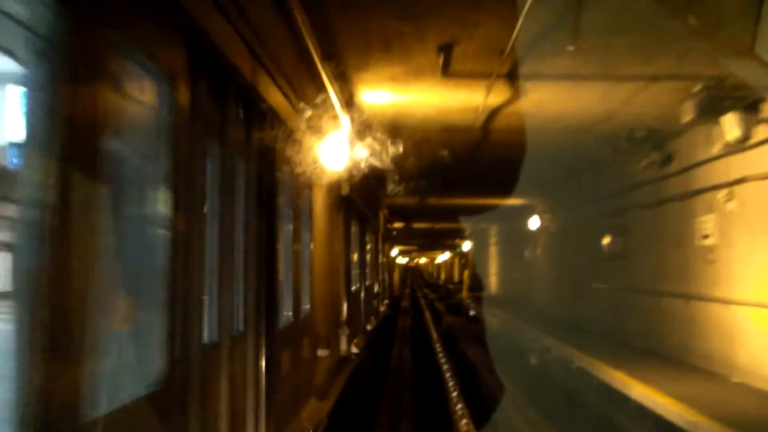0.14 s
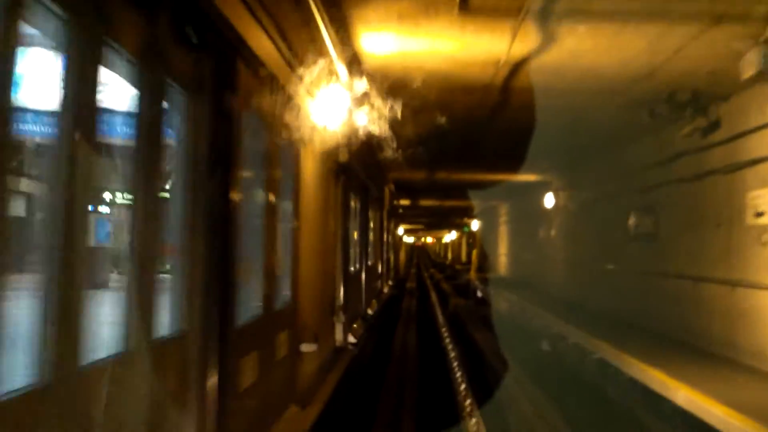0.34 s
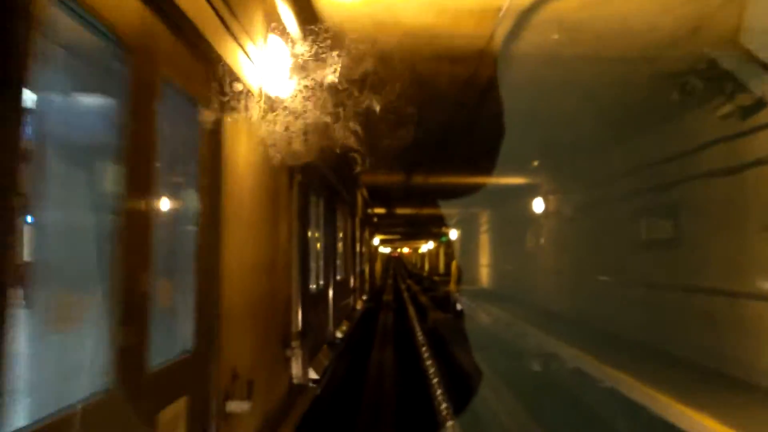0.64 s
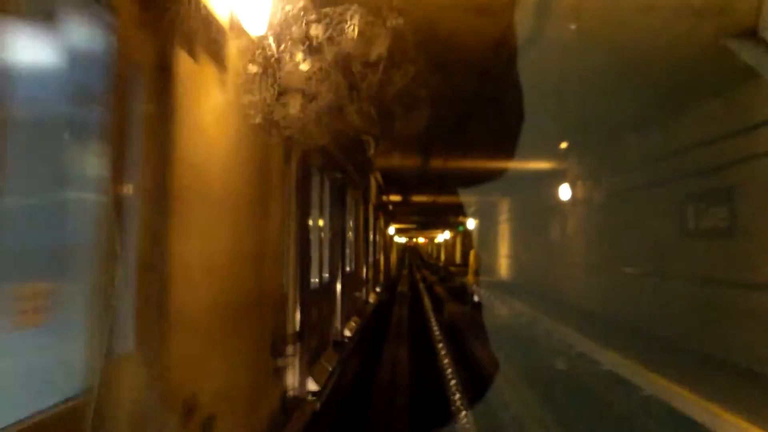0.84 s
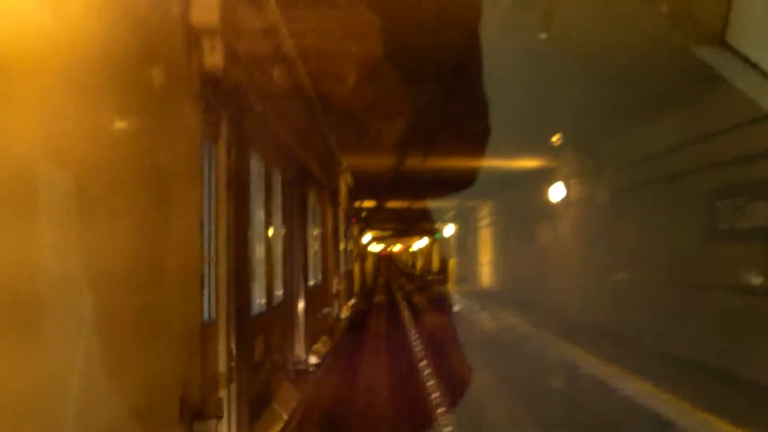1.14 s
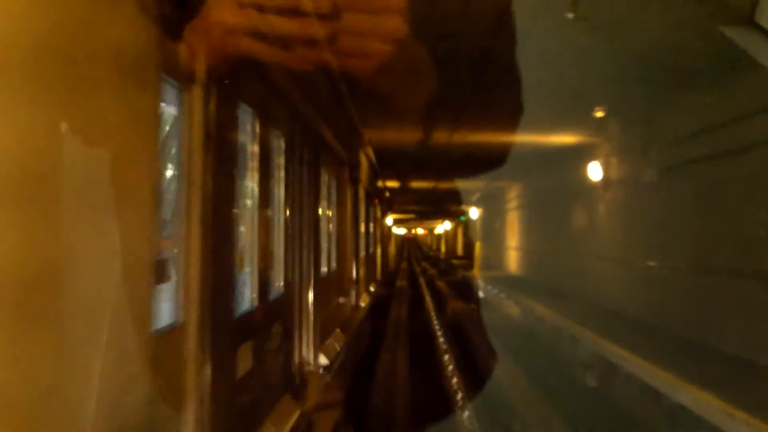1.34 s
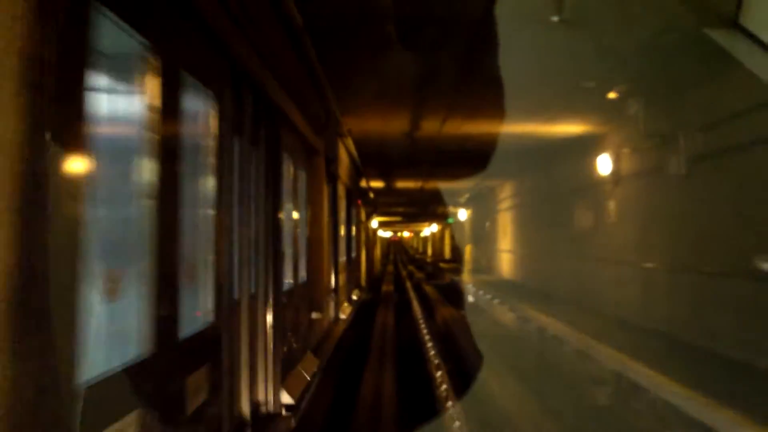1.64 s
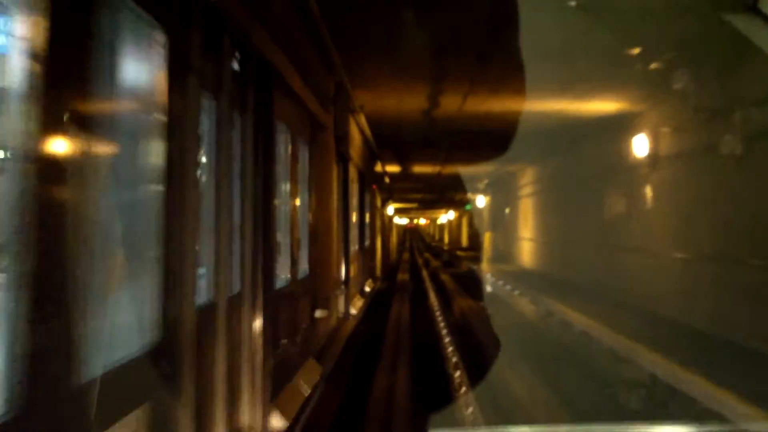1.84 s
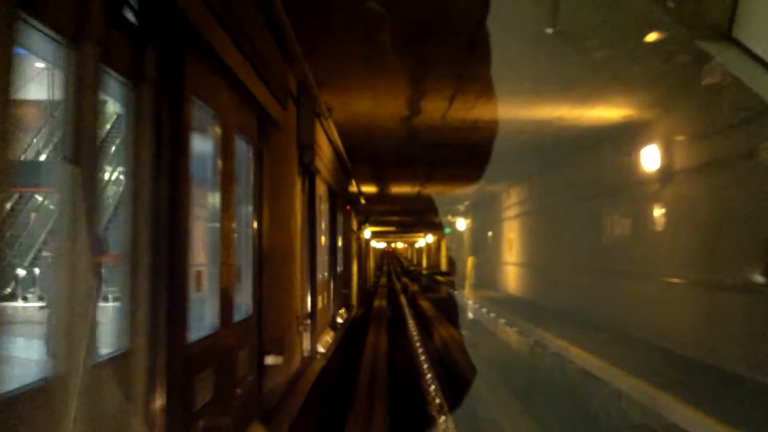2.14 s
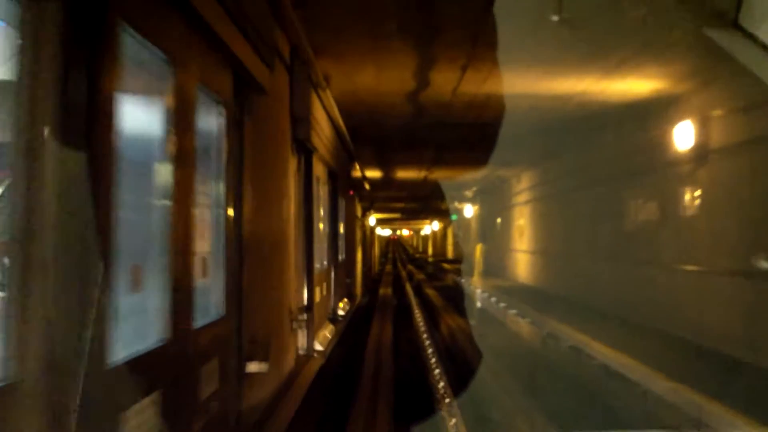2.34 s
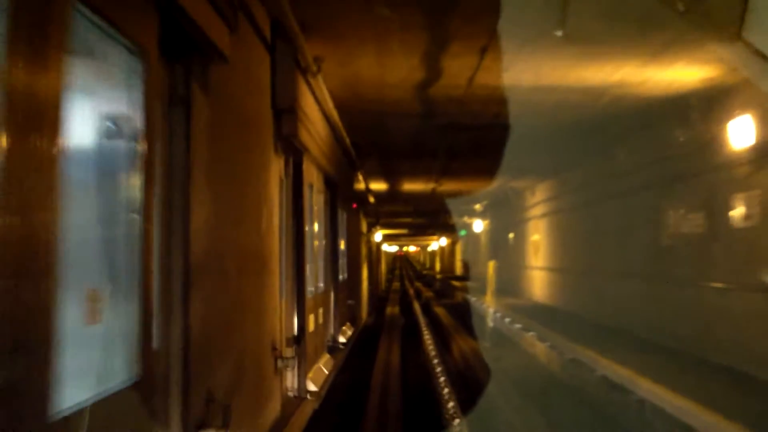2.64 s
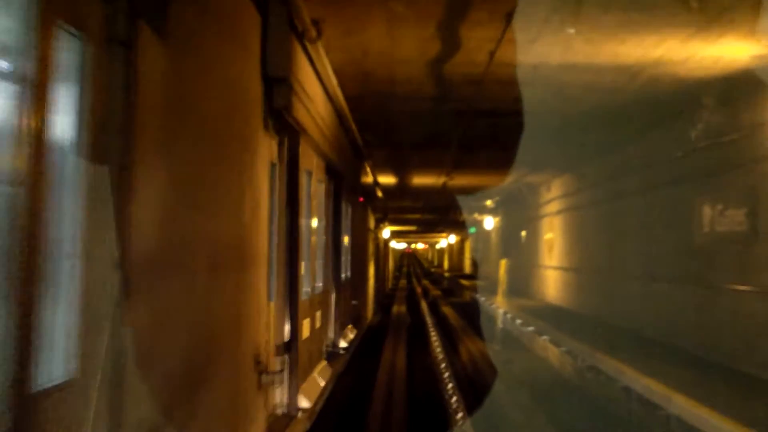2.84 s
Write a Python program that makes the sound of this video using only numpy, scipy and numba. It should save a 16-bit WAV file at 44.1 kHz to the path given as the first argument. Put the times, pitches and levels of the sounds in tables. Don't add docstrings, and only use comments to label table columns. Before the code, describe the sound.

A rubber-tyred train rolls through a tunnel, heard from inside: continuous dark tyre roar, even air hiss and very faint motor whine. Irregular jolts boom extremely low, overloading a small microphone so the sound rapidly ducks, pumps and clicks throughout. Brief faint squeaks appear early, a sharper one near 1.5 seconds; from 1.7 thin, fuzzy high squeals overlap, densest around 2.2-2.8, as the rolling swells around 2.3.

```python
import sys
import numpy as np
from scipy import signal
from scipy.fft import rfft, irfft
from scipy.io import wavfile
from scipy.ndimage import uniform_filter1d, map_coordinates
from numba import njit

SR = 44100
rng = np.random.default_rng(int(sys.argv[2]) if len(sys.argv) > 2 else 0)


def unload_audio(sound):
    columns = np.transpose(np.atleast_2d(sound))
    steps = np.round(np.clip(columns, -1, 1) * 32767)
    wavfile.write(sys.argv[1], SR, steps.astype(np.int16))


def boost_factor(decibels):
    exponent = np.asarray(decibels, float) / 20
    return 10 ** exponent


N = 132300

# (pitch [Hz], level [dB])
MOTOR_LINES = [(259, -37), (1497, -52.5), (1599, -53), (2523, -62), (2636, -56.5), (2743, -57.5)]
# (time [s], level [dB])
ROLLING = [(0, -31), (.3, -28), (.6, -29.5), (0.899, -28.5), (1.2, -31), (1.4, -27), (1.55, -27.5),
           (1.8, -25.5), (2, -28), (2.302, -23.5), (2.599, -25.5), (2.8, -28), (3, -27)]
# (frequency [Hz], level per Hz [dB])
ROAR_COLOUR = [(60, -106), (130, -1.5), (260, -2.5), (400, -7.5), (600, -11.5), (1100, -13.5), (1700, -21),
               (3200, -31.5)]
# (frequency [Hz], level per Hz [dB])
HISS_COLOUR = [(1500, -0.5), (3000, -1), (4500, -3.5), (7500, -4.5), (8600, -12), (9700, -5),
               (10800, -13.5), (12300, -23)]
# (start [s], length [s], pitch [Hz], level [dB])
SQUEALS = [(.37, 0.045, 6450, -46), (.46, 0.085, 6450, -48.5), (0.67, 0.16, 13810, -64),
           (0.851, 0.15, 6280, -50), (1.065, 0.042, 6500, -50), (1.17, 0.061, 7230, -76),
           (1.357, 0.215, 7640, -56), (1.47, 0.041, 6400, -39.5), (1.49, .05, 10300, -53),
           (1.72, .14, 10560, -49), (1.72, .22, 7910, -52), (1.92, .17, 7660, -48),
           (1.96, .11, 10260, -50), (2.01, .18, 9490, -46), (2.1, .17, 7960, -50),
           (2.19, .1, 9390, -45), (2.19, .08, 10910, -49), (2.23, .17, 7460, -46),
           (2.25, .15, 7110, -46), (2.42, .1, 11360, -50), (2.446, 0.18, 9570, -41),
           (2.46, 0.11, 7570, -47), (2.45, .3, 10550, -53.5), (2.561, .39, 10860, -53),
           (2.575, .12, 8260, -49), (2.644, 0.21, 7640, -44.5), (2.64, 0.15, 9400, -51),
           (2.654, 0.31, 7350, -46.5), (2.84, 0.18, 8400, -47), (2.876, 0.12, 10600, -52)]
# (start [s], length [s], pitch [Hz], level [dB])
MORE_SQUEALS = [(2.55, .12, 13800, -59), (2.66, .09, 15000, -64), (2.8, .2, 14000, -59),
                (.54, .05, 7050, -57), (.09, .08, 9700, -57), (2.6, .17, 3960, -55),
                (1.55, .21, 7760, -51), (2.27, .2, 9450, -55), (2.06, .4, 8020, -53),
                (2.56, .1, 11220, -53), (1.6, .05, 10600, -54), (2.14, .1, 9440, -50),
                (1.86, .1, 7850, -51)]
# (frequency [Hz], level per Hz [dB])
SHIMMER_COLOUR = [(4000, -12), (6500, -6), (7600, 0), (8800, -9), (10300, -4), (11900, -19), (14200, -17),
                  (15600, -24)]
# (frequency [Hz], level per Hz [dB])
TREMBLE_COLOUR = [(3, -9), (8, -7.5), (16, -5.5), (28, -1), (40, -8.5), (60, -8), (112, -10.5),
                  (138, -18.5)]
# (time [s], push direction and size [ratio], strength [dB], boom pitch [Hz])
BODY_JOLTS = [(-.013, 0.78, -2, 11.3), (0.146, -0.93, -4.5, 14.1), (0.202, 0.71, 5, 14.4),
              (0.348, -0.72, 1, 21.3), (0.419, 1, -3, 12), (0.478, -0.68, 0.5, 23), (0.553, 0.88, 3, 16.7),
              (0.625, 0.82, -2, 15.6), (0.718, 0.64, 1.5, 14), (0.786, 0.99, 0.5, 19.3),
              (0.946, 0.94, 2, 19.8), (1.087, 1, 1, 12.8), (1.21, -0.64, 5, 11.3), (1.29, 0.95, 0.5, 12.8),
              (1.358, 0.97, 2.5, 15.3), (1.438, -1.03, -5, 15.7), (1.546, -0.44, 3.5, 17.2),
              (1.634, -0.63, 1, 15.4), (1.693, 0.98, 2, 18), (1.8, 0.79, 4.5, 14.2), (1.866, 0.86, 1.5, 16),
              (1.921, -0.65, 2.5, 15.2), (2.074, 0.46, 8.5, 23.2), (2.157, -1.38, -2.5, 10.5),
              (2.257, -0.72, 7.5, 20.4), (2.398, 1, 2, 20.8), (2.517, -0.88, 0, 14.4),
              (2.615, 0.96, -5, 17.9), (2.74, -0.41, 6, 17.9), (2.933, 0.3, 4.5, 21)]


def along(points, hz):
    below, above = (points[0][0] / 3, -70), (points[-1][0] * 3, -90)
    f, db = np.transpose([below] + list(points) + [above])
    return np.interp(np.log(hz + .1), np.log(f + .1), db)


def wobble(rate, count=N):
    knots = rng.standard_normal(int(N * 400 / SR) + 4)
    return map_coordinates(knots, [np.arange(count) * min(rate, 400) / SR])


def rush(colour, patchy_db):
    z = signal.stft(rng.standard_normal(N + 8192), nperseg=512)[2]
    patches = uniform_filter1d(rng.standard_normal(z.shape), size=6, axis=0)
    patches = uniform_filter1d(patches, size=10, axis=1)
    x = signal.istft(z * boost_factor(patchy_db * patches / patches.std()), nperseg=512)[1]
    tint = boost_factor(along(colour, np.fft.rfftfreq(len(x), 1 / SR)))
    x = irfft(rfft(x) * tint, len(x))[:N]
    return x / x.std()


def motor():
    t, out = np.arange(N) / SR, np.zeros(N)
    for hz, db in MOTOR_LINES:
        level = boost_factor(db + 3.2 * wobble(5.17))
        out += level * np.sin(2 * np.pi * hz * t + 1.16 * wobble(8))
    return out


def tyres():
    hiss_db, hiss_swing = -18, 1.3
    s, db = np.transpose(ROLLING)
    usual_db = db.mean()
    roar_level_db = np.interp(np.arange(N) / SR, s, db) + 0.62 * wobble(9.29)
    hiss_level_db = usual_db + hiss_db + hiss_swing * (roar_level_db - usual_db)
    roar = boost_factor(roar_level_db) * rush(ROAR_COLOUR, patchy_db=1.0)
    hiss = boost_factor(hiss_level_db) * rush(HISS_COLOUR, patchy_db=1.0)
    return roar + hiss


def squeals():
    width_hz, drift_hz, edge_s, flutter_db = 220, 40, .06, 2
    t = np.arange(N) / SR
    shimmer_db = -46 + 8 * np.minimum(t - 2.4, 0)
    out = boost_factor(shimmer_db) * rush(SHIMMER_COLOUR, patchy_db=3)
    for s, length, hz, db in list(SQUEALS) + list(MORE_SQUEALS):
        first = max(round((s - .1) * SR), 0)
        span = slice(first, first + SR // 2 + SR // 10)
        age = t[span] - s
        count = len(age)
        shape = np.clip(np.minimum(age, length - age) / edge_s + .5, 0, 1) ** 2
        fuzz = wobble(width_hz, count) + 1j * wobble(width_hz, count)
        phase = 2 * np.pi * np.cumsum(hz + drift_hz * wobble(16, count)) / SR
        level = boost_factor(db + flutter_db * wobble(25, count))
        out[span] += shape * level * np.real(fuzz * np.exp(1j * phase))
    return out


def body():
    fade_60db_s, handover_s = 0.74, 0.0138
    overtone_ratio, overtone_db = 1.9, -14
    t = np.arange(N) / SR
    out = boost_factor(-15) * rush(TREMBLE_COLOUR, patchy_db=0)
    ends = [row[0] for row in BODY_JOLTS[1:]] + [N / SR + 1]
    for (s, push, db, hz), end in zip(BODY_JOLTS, ends):
        age = np.clip(t - s, 0, None)
        alive = np.clip((end - t) / handover_s, 0, 1)
        swing = np.sin(2 * np.pi * hz * age)
        swing += boost_factor(overtone_db) * np.sin(2 * np.pi * overtone_ratio * hz * age)
        out = out + push * alive * boost_factor(db - 60 * age / fade_60db_s) * swing
    return out


def scene():
    return (motor() + tyres() + squeals() + body())[None]


@njit
def gain_control(x, top, duck, wait, climb, step, hold, most, ticks, gain):
    out, owed, since = np.empty_like(x), 1.0, 0
    for i in range(len(x)):
        since += 1
        if abs(x[i]) * gain > top and since > wait[i]:
            gain, since = gain * duck, 0
        owed = min(owed * climb, step)
        if ticks[i] and owed >= step and gain * step <= most and since > hold:
            gain, owed = gain * step, 1.0
        out[i] = x[i] * gain
    return out


def camera_gain(x):
    clock_s, first_tick_s = 512 / 48000, .00195
    duck_wait_s, hold_s, climb_db_per_s = .00004, .006, 80
    ticks = np.zeros(N, bool)
    ticks[np.round(np.arange(first_tick_s, N / SR - 1 / SR, clock_s) * SR).astype(int)] = True
    wait = duck_wait_s * SR * rng.exponential(size=N)
    return gain_control(x, top=boost_factor(-8), duck=boost_factor(-.09), wait=wait, climb=boost_factor(climb_db_per_s / SR),
                        step=boost_factor(1.4), hold=hold_s * SR, most=boost_factor(2), ticks=ticks, gain=boost_factor(-5))


def roll_off(x):
    return signal.sosfilt(signal.butter(12, 15780, fs=SR, output="sos"), x)


def record(dry):
    x = dry[0] + boost_factor(-62) * rng.standard_normal(N)
    x = camera_gain(x)
    x = signal.lfilter(*signal.butter(1, 2, 'high', fs=SR), x)
    return roll_off(x[None])


dry = scene()
out = record(dry)
unload_audio(out)
```